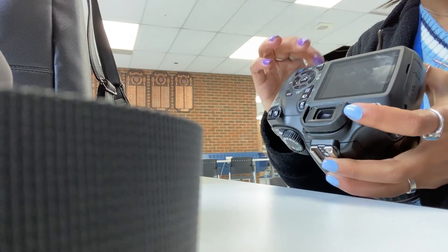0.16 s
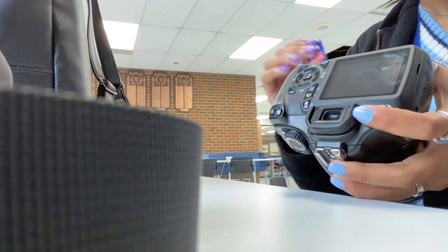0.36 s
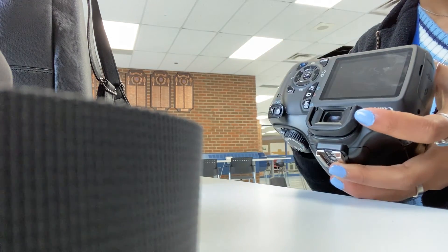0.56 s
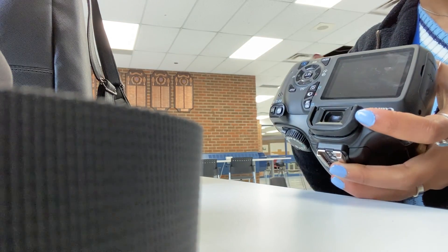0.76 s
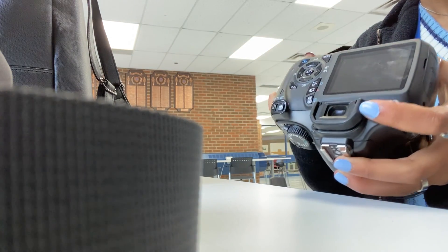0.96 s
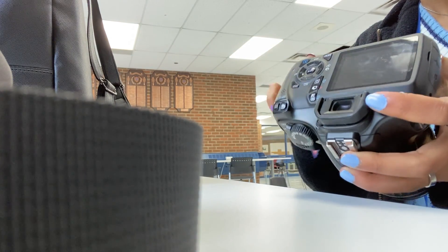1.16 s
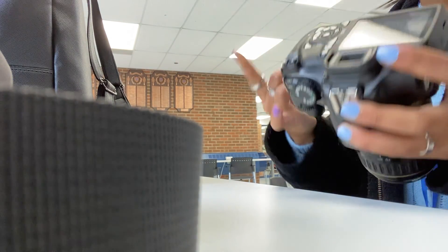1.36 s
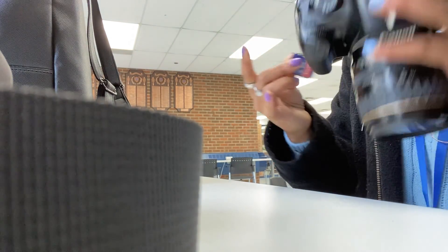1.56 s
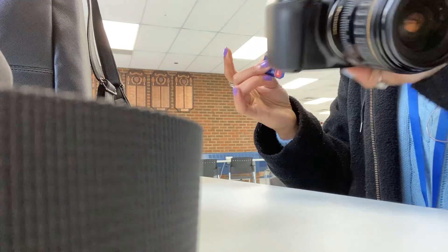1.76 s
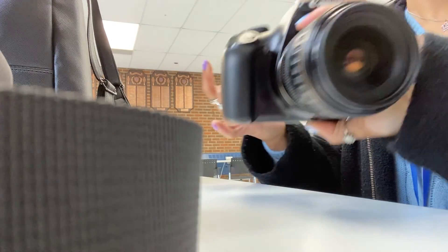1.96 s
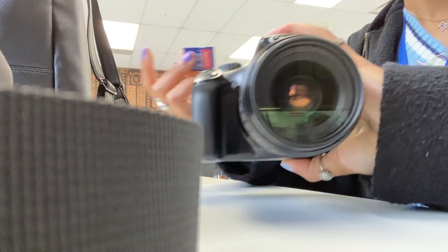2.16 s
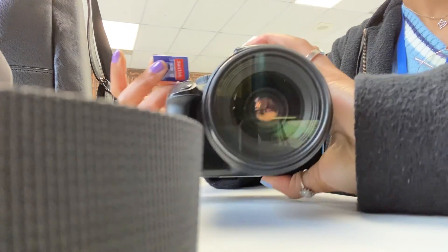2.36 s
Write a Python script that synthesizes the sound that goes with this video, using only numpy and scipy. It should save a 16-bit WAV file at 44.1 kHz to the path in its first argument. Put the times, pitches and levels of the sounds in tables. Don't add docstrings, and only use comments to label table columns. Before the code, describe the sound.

A camera's plastic card door clicks and snaps, heard close. Fingernails tick from the start, and a card scrapes with tiny squeaks around 0.13-0.22 seconds. Crisp snaps come at 0.55 and 0.64, then the loudest, heavier closing snap at 0.95. Soft knocks follow at 1.2, cloth rustle and a knock around 1.55, a faint click at 2.03 and last taps near 2.37. Low ventilation hums beneath, with a short hall tail.

```python
import sys
import numpy as np
from scipy import signal
from scipy.fft import rfft, irfft
from scipy.io import wavfile
from scipy.ndimage import uniform_filter1d

SR = 44100
rng = np.random.default_rng(int(sys.argv[2]) if len(sys.argv) > 2 else 0)


def generate_wav(signal):
    frames = np.transpose(np.atleast_2d(signal))
    scaled = np.clip(frames, -1, 1) * 32767
    pcm = np.round(scaled).astype(np.int16)
    wavfile.write(sys.argv[1], SR, pcm)


def invert_db(level):
    return 10 ** (np.asarray(level, dtype=float) / 20)


N = 106942


def evened(x):
    return x / np.sqrt(np.mean(x ** 2) + 1e-20)


def read(points, hz):
    f, value = np.transpose(points)
    return np.interp(np.log(hz + 1), np.log(f + 1), value)


def add(mix, s, sound):
    part = mix[round(s * SR):][:len(sound)]
    part += sound[:len(part)]


def colour(x, tone):
    hz = np.fft.rfftfreq(x.shape[-1], 1 / SR)
    gain = invert_db(read(tone, hz)) * (hz > .7 * tone[0][0])
    return irfft(rfft(x) * gain, x.shape[-1])


def level(curve):
    s, db = np.transpose(curve)
    return uniform_filter1d(invert_db(np.interp(np.arange(N) / SR, s, db, -120, -120)), size=200)


BODY_RATTLE, NAIL_RATTLE = .3, 2.5
SPREAD, SPREAD_HZ = 1.5, 1400


def hit(contact_s, modes, loose, low_hz=0, low_db=0, count=2000):
    t = np.arange(count) / SR
    u = t / max(contact_s, 3e-4)
    rattle = rng.standard_normal(count) * np.minimum(u / 1.4, 1) * np.exp(-2.5 * u ** 2)
    out = np.zeros((3, count))
    for k, ((hz, width, db), late) in enumerate(zip(modes, rng.random(len(modes)))):
        since = np.maximum(np.array([t - 0.73 * late * contact_s, t, t]), 0)
        widen = np.array([[1], [max(SPREAD, SPREAD_HZ / width)], [1]])
        age = 1.5 * np.pi * width * widen * since
        gain = (-1) ** k * invert_db(db + low_db * (hz < low_hz)) * width * np.sqrt(widen)
        out += gain * age * np.exp(-age) * np.sin(2 * np.pi * hz * since)
    out[0] += loose * signal.fftconvolve(rattle / np.linalg.norm(rattle), out[2])[:count]
    out[1] *= np.linalg.norm(out[0]) / np.linalg.norm(out[1])
    return out[:2].T / np.sqrt(uniform_filter1d(out[0] ** 2, size=130).max())


# frequency in Hz, density in dB per Hz.
RUMBLE = [(20, -38), (32, -20), (42, -1.5), (59, 3), (81, -6), (113, -3.5), (193, -5.5), (522, -24.5),
          (600, -37), (780, -67), (1320, -120)]
# frequency in Hz, density in dB per Hz.
AIR = [(400, 5), (620, 6), (1000, -5), (2500, -21.5), (3500, -30), (8500, -31.5), (12600, -31.5),
       (13600, -65)]
# frequency in Hz, width in Hz, level in dB.
FAN_LINES = [(50, 4.8, -54.5), (110.5, 9.27, -54.5), (526.8, 10.22, -64.5), (665, 9.28, -70.5)]
# frequency in Hz, left-right likeness from 0 to 1.
NOISE_SAME = [(45, .97), (85, .62), (170, .4), (350, .42), (700, .05), (3000, .1), (7000, .6), (10000, .97)]
RUMBLE_DB, AIR_DB = -44, -59


def ventilation():
    hz = np.fft.rfftfreq(N, 1 / SR)
    a, b = rfft(rng.standard_normal((2, N)))
    same = read(NOISE_SAME, hz)
    pair = irfft(np.array([a, same * a + np.sqrt(1 - same ** 2) * b]), N)
    out = invert_db(RUMBLE_DB) * evened(colour(pair, RUMBLE)) + invert_db(AIR_DB) * evened(colour(pair, AIR))
    t = np.arange(N) / SR
    for f, width, db in FAN_LINES:
        slow = uniform_filter1d(rng.standard_normal((2, N)), size=4000)
        level_waver, pitch_waver = evened(uniform_filter1d(slow, size=4000))
        cycles = f * t + np.cumsum(0.4027 * width * pitch_waver) / SR
        out += invert_db(db + 3.2 * level_waver) * np.sqrt(2) * np.sin(2 * np.pi * cycles)
    return out


# start in seconds, length in seconds, level in dB, centre in Hz, width in Hz.
BRUSHES = [(0, 0.023, -82.5, 12500, 3000), (0.575, 0.12, -76.5, 6400, 1160),
           (1.49, 0.15, -76.5, 6800, 3500), (1.508, 0.14, -83, 13400, 3000),
           (1.558, 0.2, -77.5, 6500, 3000), (1.579, 0.27, -75.5, 13100, 3540),
           (1.538, 0.26, -71.5, 1400, 1200), (1.5, 0.27, -86, 3570, 1800), (1.846, .07, -84.5, 13000, 2510),
           (2.142, 0.075, -80, 7820, 1794), (2.311, 0.23, -84.5, 13000, 3000)]


def brushes():
    out = np.zeros(N)
    f = np.fft.rfftfreq(N, 1 / SR)
    for s, length, db, hz, width in BRUSHES:
        u = np.arange(round(length * SR)) / (length * SR)
        band = irfft(rfft(rng.standard_normal(N)) * np.exp(-2 * ((f - hz) / width) ** 2), N)
        flutter = invert_db(2.5 * evened(uniform_filter1d(rng.standard_normal(N), size=900)))
        add(out, s, invert_db(db) * (evened(band) * flutter)[:len(u)] * np.sin(np.pi * u ** 0.46))
    return np.array([out, out]).T


# start in seconds, peak in dB, modes below 10 kHz in dB, contact in seconds.
TICKS = [(0.0398, -47, -32, 0.0015), (0.046, -50.5, -12.5, 0.0088), (0.129, -57, 5.5, 0.0045),
         (0.1828, -35.5, -4.5, 0.0014), (0.187, -41, -15, 0.0035), (0.202, -53, -6, 0.0012),
         (0.209, -49.5, -8, 0.0015), (0.214, -58.5, -6, 0.002), (0.22, -54, -16, 0.0012),
         (0.2876, -59, -29, 0.0025), (0.293, -53.5, -29, 0.0037), (0.299, -66, -24, 0.0014),
         (0.403, -66.5, -22, 0.0016), (.4565, -70, -24, .002), (0.484, -67.5, -15.5, 0.00122),
         (1.197, -65.5, 5, 0.0053), (1.212, -58, 2, 0.0054), (1.224, -62, 2, 0.0016),
         (1.2777, -65.5, -30, 0.0031), (1.33, -60, -34, 0.0038), (2.364, -56.5, -4.5, 0.0026)]
# frequency in Hz, width in Hz, level in dB.
NAIL = [(4720, 790, 1.5), (6500, 2700, -8), (8800, 2200, -2), (11800, 520, 4.5), (12820, 3000, 4.5),
        (14980, 1200, -0.5)]


def nail_ticks():
    out = np.zeros((N, 2))
    for s, db, mid_db, contact_s in TICKS:
        add(out, s - .001, invert_db(db) * hit(contact_s, NAIL, NAIL_RATTLE, low_hz=10000, low_db=mid_db))
    return out


# time in seconds, level in dB.
SLIDE = [(.115, -80), (.13, -60.5), (.145, -66), (.16, -55), (.176, -62), (.19, -56), (.215, -63),
         (.24, -94)]
# frequency in Hz, density in dB per Hz.
SLIDE_TONE = [(900, -3), (1700, 2.5), (2400, -15), (3100, 0.5), (4300, -10.5), (7800, -11), (12500, -9.5),
              (16000, -24)]
GRIT_HZ, GRIT_PER_S, GRIT_CYCLES, GRIT_DB = (800, 5000), 1100, 4.5, -1


def card_slide():
    t, grit = np.arange(400) / SR, np.zeros(N)
    for hz in np.geomspace(*GRIT_HZ, num=10):
        struck = rng.random(N) < GRIT_PER_S / 10 / SR
        train = struck * invert_db(3.3 * np.minimum(rng.exponential(1, N), 3))
        grain = hz * t * np.exp(-hz * t / GRIT_CYCLES * 3) * np.sin(2 * np.pi * hz * t)
        grit += signal.oaconvolve(train, grain)[:N]
    hiss = evened(colour(rng.standard_normal(N), SLIDE_TONE))
    out = (invert_db(-0.5) * hiss + invert_db(GRIT_DB) * evened(grit)) * level(SLIDE)
    return np.array([out, out]).T


# start in seconds, peak in dB, ring in Hz, contact in seconds.
SLIPS = [
    (0.131, -61.5, 4270, 0.0053),
    (0.135, -59, 1660, .004),
    (.153, -60, 4250, .003),
    (.159, -55, 3070, 0.0041),
    (0.164, -54.5, 1900, .004),
    (0.165, -56.5, 4150, 0.0032),
    (0.175, -61, 2930, .003),
    (.188, -53.5, 3180, 0.0023),
    (.202, -50, 740, .003),
]


def card_slips():
    out = np.zeros((N, 2))
    for s, db, hz, contact_s in SLIPS:
        add(out, s - .001, invert_db(db) * hit(contact_s, [(hz, 170, 0)], NAIL_RATTLE))
    return out


# start in seconds, peak in dB, main ring in Hz, width in Hz, shell against main ring in dB.
KNOCKS = [(0.1829, -36, 1560, 298, -17), (0.894, -64, 3500, 700, -13), (1.199, -50, 1360, 220, -13),
          (1.2015, -51.5, 1720, 250, -15), (1.5506, -57, 2860, 700, 1), (1.5807, -43.5, 1450, 400, -7),
          (1.5808, -54.5, 2850, 502, -15), (1.828, -69, 5930, 700, -8), (2.115, -56.5, 3600, 900, -1),
          (2.1394, -65, 6500, 700, -1), (2.207, -52, 1346, 500, -11), (2.373, -50, 1450, 700, -13)]
# frequency in Hz, width in Hz, level in dB.
SHELL = [(900, 370, 6.5), (1985, 530, 2), (2620, 390, 2), (4400, 320, -24)]


def fingertip_knocks():
    out = np.zeros((N, 2))
    for s, db, hz, width, shell_db in KNOCKS:
        modes = [(hz, width, -shell_db)] + SHELL
        add(out, s - .001, invert_db(db - 4) * hit(0.00207, modes, BODY_RATTLE))
    return out


# start in seconds, peak in dB, contact in seconds, low modes in dB.
SNAPS = [
    [(.5476, -31.5, 0.00048, 3.5), (.5482, -33.5, 0.00059, -11.5), (.5497, -56.5, 0.0016, -8),
     (.5565, -53, 0.0045, 3)],
    [(.6433, -30, 0.00037, -5), (.6443, -29.5, 0.00045, 1.5), (.6462, -36.5, 0.00043, -2),
     (.6478, -42.5, 0.00044, -5.5), (.6505, -43, .002, 8), (.655, -44.5, 0.0081, 16)],
    [(.9492, -42.5, 0.0034, 26.5), (.9525, -43, 0.0029, 20.5), (.9564, -29, 0.00069, 6),
     (.958, -23.5, 0.00039, -12), (.9591, -31, 0.00046, -23), (.9614, -36, 0.0012, 7.5),
     (.9655, -51, .004, 6)],
    [(2.0297, -41.5, .0012, 0), (2.0312, -45, 0.0016, -3), (2.0407, -75, 0.0067, 0)],
]
# frequency in Hz, width in Hz, level in dB.
BODY = [
    [(670, 150, -3), (857, 53, -7.5), (1090, 190, 2.5), (1715, 160, -5.5), (2050, 150, -12.5),
     (2550, 200, -10), (3120, 250, 0), (3600, 300, -4.5), (4150, 385, -12), (5700, 450, -6),
     (6440, 320, -4.5), (7900, 960, -15), (10600, 900, -9.5), (14100, 1000, -18.5)],
    [(445, 62, 2.5), (567, 99, 0), (770, 190, -3), (1160, 80, -3), (1410, 226, -2), (2990, 290, -4),
     (3500, 290, -7.5), (4190, 594, -2), (5450, 740, -10.5), (6070, 400, -8), (8100, 280, -5),
     (9400, 860, -9.5), (11390, 1200, -10), (14900, 460, -9)],
    [(560, 200, -3.5), (833, 220, 3), (1725, 280, 0.5), (2606, 150, -5.5), (2884, 140, -8.5),
     (4090, 570, -5), (5080, 410, -5.5), (6200, 1000, -11.5), (7220, 350, -12), (7870, 370, -5),
     (9500, 1200, -14.5), (12500, 690, -3.5), (13540, 800, -10), (14300, 450, -4)],
    [(1470, 840, 2), (2150, 360, -6), (3090, 1080, 4), (4650, 350, -5.5), (7180, 3400, -10.5),
     (13800, 1500, -16.5)],
]
LOW_HZ, LOOSE_S, BLUR_S = 2300, .0028, .001


def latch_snaps():
    out = np.zeros((N, 2))
    for impacts, modes in zip(SNAPS, BODY):
        first_s = impacts[0][0]
        run = np.zeros((4096, 2))
        for s, db, contact_s, low_db in impacts:
            loose = BODY_RATTLE if contact_s < LOOSE_S else NAIL_RATTLE
            add(run, s - first_s, invert_db(db) * hit(contact_s, modes, loose, low_hz=LOW_HZ, low_db=low_db))
        power = uniform_filter1d(uniform_filter1d(abs(rfft(run[:, 0])) ** 2, size=90), size=70)
        peak = abs(run[:, 0]).argmax()
        run[:, 1] = np.roll(irfft(np.sqrt(abs(power))), round(BLUR_S * SR) + peak)
        run[2048:, 1] = 0
        add(out, first_s - .0004, run)
    return out


# frequency in Hz, reverberation time T60 in seconds.
HALL = [(500, 0.35), (2000, 0.42), (6000, 0.34), (14000, 0.2)]
HALL_DB, HALL_CUT_S, HALL_SAME = -17, 0.17, 0.44
TABLE_DB, TABLE_T60, TABLE_SAME = -9.5, 0.056, 0.78


def hall(both):
    direct, sent = both.T
    taps = rng.standard_normal((3, SR // 2))
    hz, t, z = signal.stft(taps, SR, nperseg=256)
    decay_db = -60 * t / read(HALL, hz)[:, None] - 10 * (t / HALL_CUT_S) ** 6
    tail = signal.istft(z * invert_db(decay_db), SR, nperseg=256)[1]
    age = np.arange(tail.shape[1]) / SR
    tail = tail * np.minimum(age / 0.0051, 1)
    sides = HALL_SAME * tail[0] + np.sqrt(1 - HALL_SAME ** 2) * tail[1:]
    tail = sides * invert_db(HALL_DB) / np.linalg.norm(tail[0])
    near = rng.standard_normal((3, len(age)))
    near = TABLE_SAME * near[0] + np.sqrt(1 - TABLE_SAME ** 2) * near[1:]
    near = near * invert_db(-60 * age / TABLE_T60)
    echoes = tail + invert_db(TABLE_DB) * near / np.linalg.norm(near[0])
    return direct + signal.fftconvolve(sent[None], echoes, axes=1)[:, :N]


def scene():
    rubs = brushes() + card_slide()
    contacts = nail_ticks() + card_slips() + fingertip_knocks() + latch_snaps()
    return hall(rubs + contacts) + ventilation()


def low_pass(x):
    return signal.sosfilt(signal.butter(12, 16490, fs=SR, output="sos"), x)


# frequency in Hz, lead of the left in radians.
PORTS = [(250, 0), (800, -1.1), (2700, -1.1), (3960, .9), (4650, -1.2), (7240, -.7), (10100, -3.1),
         (13000, -6.2), (16000, -9.3)]
# frequency in Hz, left over right in dB.
LEAN = [(60, -1), (550, 2.5), (2500, -1.5), (5000, 1), (8000, 0.5)]
TOP_HZ, STOP_S = 15780, 0.0032


def record(dry):
    hz = np.fft.rfftfreq(N, 1 / SR)
    port = invert_db(read(LEAN, hz) / 2) * np.exp(.5j * read(PORTS, hz))
    edge = invert_db(-14. * np.maximum(hz - TOP_HZ, 0) / 1000)
    fade = np.minimum(np.arange(N)[::-1] / SR / STOP_S, 1) ** 2
    mix = fade * irfft(rfft(dry) * edge * np.array([port, 1 / port]), N)
    return low_pass(mix)


dry = scene()
out = record(dry)
generate_wav(out)
```